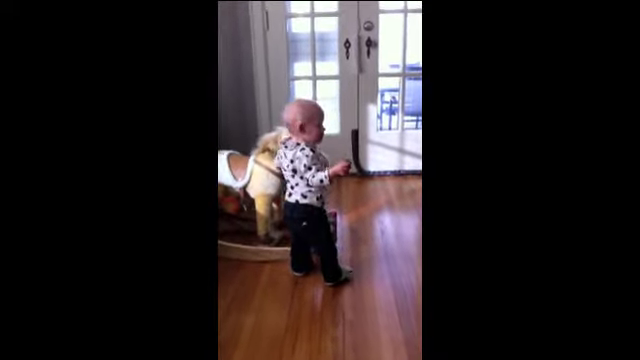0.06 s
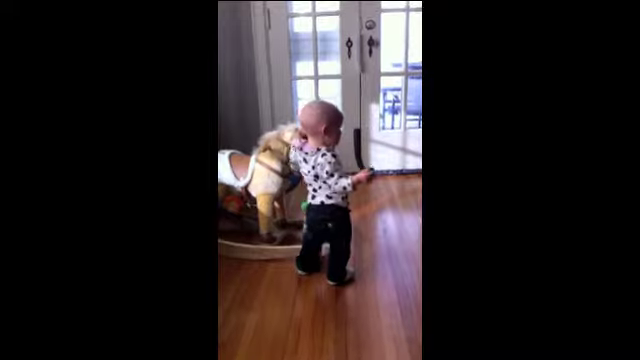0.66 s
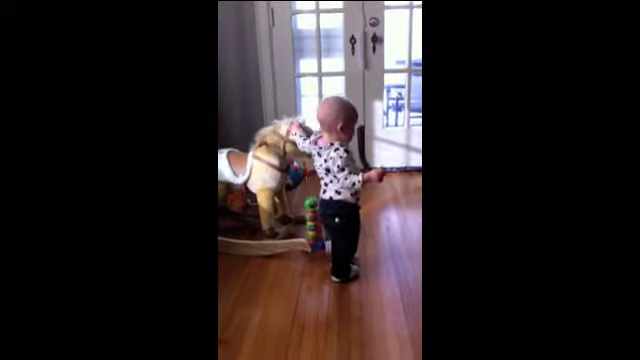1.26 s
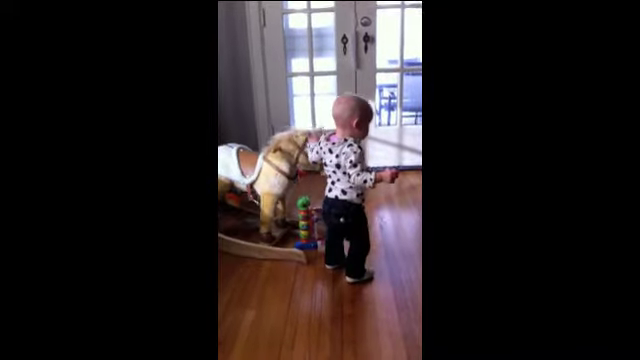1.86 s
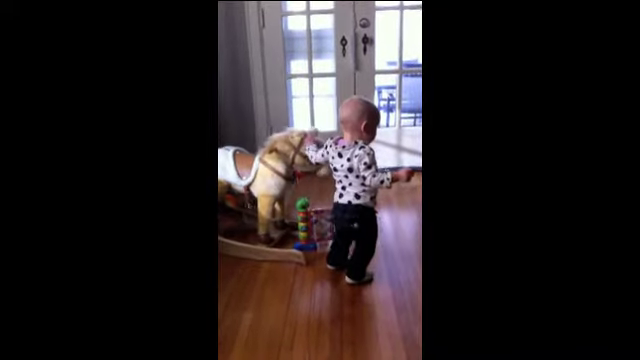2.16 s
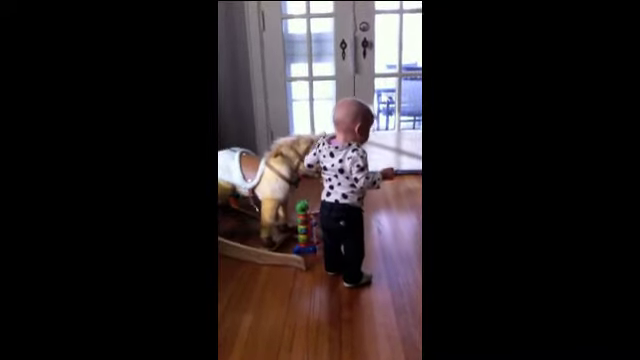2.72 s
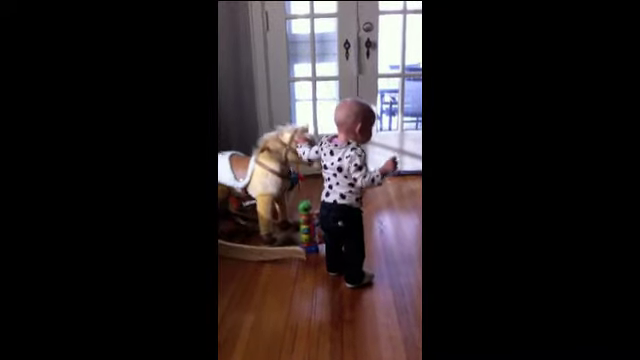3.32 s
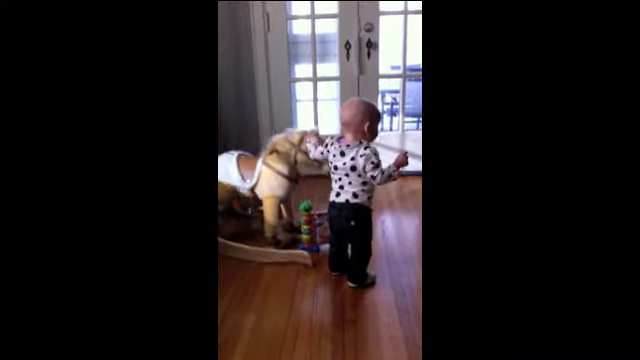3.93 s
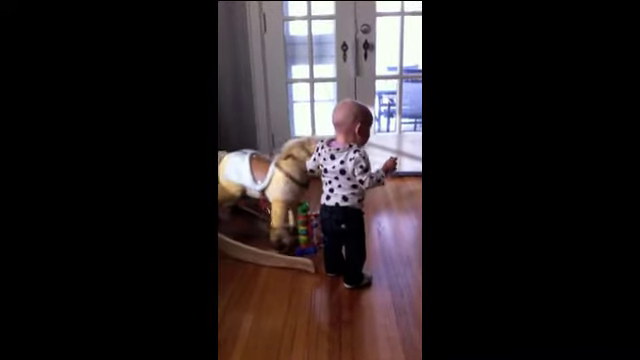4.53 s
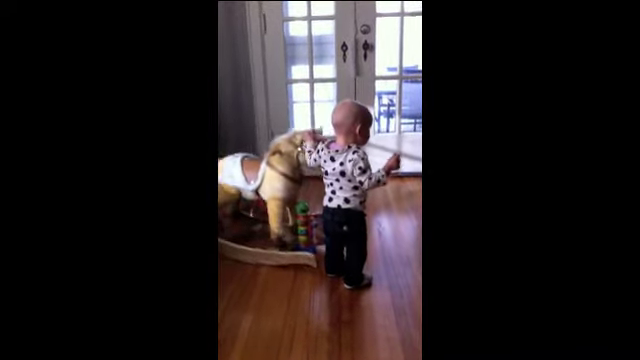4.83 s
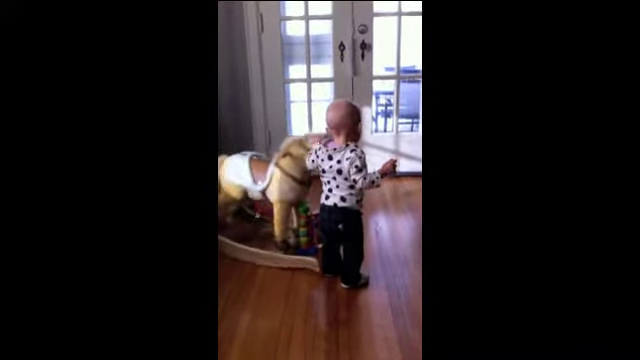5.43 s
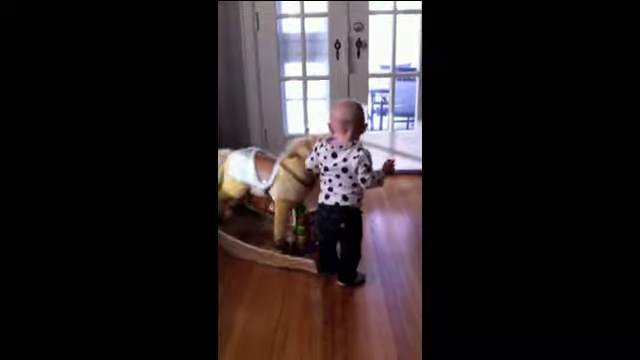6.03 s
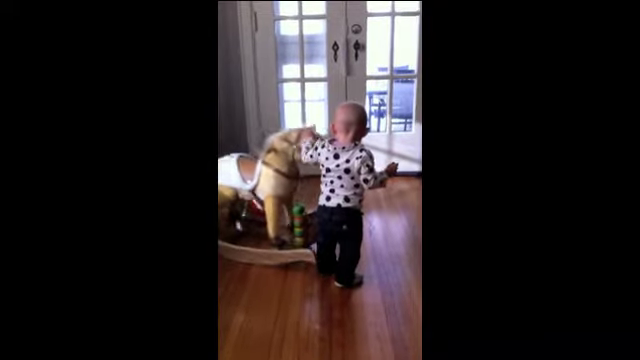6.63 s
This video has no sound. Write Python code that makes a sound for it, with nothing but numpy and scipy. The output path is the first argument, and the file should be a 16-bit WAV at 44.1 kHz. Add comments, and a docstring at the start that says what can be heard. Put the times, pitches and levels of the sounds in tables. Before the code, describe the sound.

Steady wooden knocks and hollow floorboard thumps from a toy rocking horse, with a light rattle over the last swings.

```python
"""A toddler on a wooden rocking horse, on a living room's hardwood floor, heard by one small microphone.
A toy is tapped, and cloth brushes the plush over a faint hiss as the child takes hold. From about 2 s
the horse swings six times: a rocker rolls in and knocks on the boards, the weight lands with a deeper
thump, and the horse rolls back. Between swings the boards bump softly. Over the last two swings the
harness rattles, and two faint squeaks follow."""
import sys
import numpy as np
from scipy import signal
from scipy.fft import rfft, irfft, next_fast_len
from scipy.io import wavfile
from scipy.ndimage import uniform_filter1d

SR = 44100
rng = np.random.default_rng(int(sys.argv[2]) if len(sys.argv) > 2 else 0)


def master(y):
    """Save y as 16-bit WAV."""
    cut = np.clip(np.atleast_2d(y).T, -1, 1)
    pcm = np.round(cut * 32767)  # scale
    wavfile.write(sys.argv[1], SR, pcm.astype(np.int16))


N = 294487
AGE = np.arange(SR) / SR  # seconds since a contact

# The living room's reverberation. Each row: frequency in Hz, seconds to fall 60 dB.
ROOM_DECAY = [(60, 0.27), (130, 0.8), (250, 0.63), (600, 0.55), (1500, 0.47), (3000, 0.44), (6000, 0.5),
              (14000, 0.33)]

# Noise colours. Each row: frequency in Hz, relative spectral density in dB.
HISS_SPECTRUM = [(15, -61.5), (25, -43), (92, -20), (130, -3.5), (153, -13), (236, -7), (354, -16.5),
                 (394, -12), (439, -17.5), (659, -16.5), (840, -17.5), (1400, -18.5), (16000, -26)]  # room tone
CLOTH_SPECTRUM = [(200, -10), (700, 4), (1300, -3), (3200, -4.5), (6000, -10), (15000, -10)]  # sleeves on plush
TICK_SPECTRUM = [(400, -10), (1000, -3), (2000, -1), (4000, -7.5), (7000, -14), (15000, -11)]  # a small hard contact
CLACK_SPECTRUM = [(150, -11), (300, 8), (700, 0.5), (1800, -4), (3000, -8.5), (6000, -32.5)]  # loose parts colliding
CRACK_SPECTRUM = [(1500, -17), (3000, -1), (5000, 2), (7500, -2.5), (12000, 1), (16000, -6.5)]  # the treble of a hit or rattle
RUMBLE_SPECTRUM = [(30, -40), (90, -12), (130, -3), (215, 2), (290, -4.5), (400, -13), (700, -19),
                   (1500, -37.5), (4000, -67)]  # rockers rolling
BOOM_SPECTRUM = [(20, -41), (50, -48), (100, -20.5), (134, -3), (160, -9), (215, 0.5), (290, -2),
                 (355, -12.5), (450, -32), (900, -64)]  # the floor's spreading boom
THUMP_SPECTRUM = [(250, -26), (430, -0.5), (520, 3.5), (680, -4.5), (850, -10), (1200, -8), (1750, -14),
                  (2400, -18.5), (5000, -35), (9000, -69)]  # dense overtones of wood in a landing or bump
KNOCK_SPECTRUM = [(250, -33), (450, -6), (620, -14.5), (1200, -4.5), (1750, -8.5), (2300, -16),
                  (3200, -23.5), (5000, -31), (9000, -68)]  # dense overtones of wood in a knock
SNAP_SPECTRUM = [(1000, -28), (3000, -5), (6000, -37), (9000, -8), (12500, 11), (16000, 9)]  # a rocker's sharp edge

# Ringing wood. Each row: frequency in Hz, relative level in dB, seconds to fall 60 dB.
TOY_MODES = [(750, -20, 0.4), (1140, 6, 0.19), (1810, 8, 0.2), (1960, -11, 1.2), (2560, 11, 0.069),
             (3860, -9, 0.39)]  # a wooden toy
JOIST_MODES = [(130.8, -6, 1.8), (140.6, 0, 0.68)]  # the floor's slow, deep ring
LIGHT_BOARD_MODES = [(156, -9, 0.22), (188, -3, 0.15), (219.1, 2, 0.3), (240.9, -1.5, 0.28),
                     (304, -2, 0.22)]  # floorboards under a knock or bump
LOADED_BOARD_MODES = [(164, -11, 0.085), (191.4, -1, 0.24), (239.1, -3.5, 0.49), (258.2, -12, 0.36),
                      (304.7, -0.5, 0.32), (351.5, -15.5, 0.74)]  # floorboards under the full weight
FRAME_MODES = [(502.5, -5, 0.29), (618, 13, 0.044), (796, 1, 0.071), (887, -6, 0.13), (979, -0.5, 0.11),
               (1053, -9, 0.12), (1163, 0.5, 0.29), (1285, -6.5, 0.16), (1657, 13, 0.03), (1743, 0, 0.066),
               (1875, -3, 0.11), (2530, -6, 0.066)]  # the horse's frame

# Cloth on plush as the child takes hold. Each row: peak time in seconds, level in dB.
CLOTH_BRUSHES = [(0.29, -68), (0.79, -67.5), (0.92, -69.5), (1.05, -64), (1.714, -64.5), (1.861, -65.5),
                 (2.26, -68.5)]
# Faint rubbing squeaks. Each row: peak time in seconds, pitch in Hz, level in dB.
RUB_SQUEAKS = [(.18, 700, -70.5), (0.305, 3570, -74), (0.913, 2400, -75), (2.225, 3060, -77),
               (6.41, 840, -68.5), (6.59, 780, -65)]
# Harness and toys rattling. Each row: start in seconds, clack level in dB, fizz level in dB.
HARNESS_RATTLES = [(0.0034, -58, -62), (1.318, -66.5, -69.5), (5.2779, -48, -54.5), (5.4768, -45, -57.5),
                   (5.9614, -69.5, -68.5), (6.0743, -57, -67.5), (6.128, -55, -59), (6.239, -65, -58)]
# Sharp little ticks. Each row: start in seconds, level in dB.
SMALL_TICKS = [(0.624, -71), (0.749, -68.5), (0.806, -71), (5.233, -67), (5.549, -66)]
# Feet and rockers bumping the boards. Each row: start in seconds, level in dB.
FLOOR_BUMPS = [(0.004, -54.5), (1.317, -66.5), (1.734, -50.5), (1.797, -58.5), (2.823, -48.5),
               (3.181, -52.5), (3.554, -49.5), (4.087, -63), (4.427, -50.5), (5.217, -50.5), (5.281, -43.5),
               (5.446, -39.5), (5.984, -47), (6.132, -39), (6.245, -44.5)]
# The weight landing after each knock, twice after the hardest.
# Each row: start in seconds, then weight and hardness in dB against an ordinary landing.
LANDINGS = [(1.9555, -11.5, 1.5), (2.7421, -7.5, 1.5), (3.759, 2.5, 2), (4.5545, 3.5, -5), (4.6518, 8.5, 0),
            (5.4108, 5.5, 0.5), (6.1727, .5, -1.5)]
# A rocker meeting the floor, once a swing.
# Each row: start in seconds, then force, hardness and edge snap in dB against an ordinary knock.
ROCKER_KNOCKS = [(1.915, -7, 3, 2), (2.677, -2.5, 2, 1), (3.681, 0, -.5, 0), (4.5265, 3, 1, 0),
                 (5.3149, 1.4, 5, -3), (6.106, 0, -1, 6)]

ROLL_BACK_S, ROLL_BACK_WIDTH_S = 0.48, 0.15  # the back swing: delay after a knock, width of its swell


def amp(db):
    """Decibels to gain."""
    return 10 ** (np.asarray(db) / 20)


def along(points, hz):
    """Read (Hz, value) points on a log frequency axis."""
    freqs, values = np.transpose(points)
    return np.interp(np.log(hz + 1), np.log(freqs + 1), values)


def filtered(x, kind, hz, order=4):
    """Butterworth low-pass or high-pass."""
    return signal.sosfilt(signal.butter(order, hz, kind, fs=SR, output="sos"), x)


def noise(spectrum, size):
    """Coloured noise of rms 1."""
    padded = next_fast_len(size)
    colour = amp(along(spectrum, np.fft.rfftfreq(padded, 1 / SR)))
    x = irfft(rfft(rng.standard_normal(padded)) * colour, padded)[:size]
    return x / x.std()


def burst(x):
    """Scale a hit to rms 1 over its first 40 ms."""
    return x / np.sqrt(np.mean(x[:SR // 25] ** 2))


def add(track, s, x):
    """Mix x into the track from s seconds on."""
    start = max(round(s * SR), 0)
    track[start:start + len(x)] += x[:N - start]


def rise(seconds):
    """The soft start of a contact."""
    return 1 - np.exp(-AGE / seconds)


def swell(s, db, width_s):
    """A bell-shaped gain that peaks at s seconds."""
    return amp(db) * np.exp(-((np.arange(N) / SR - s) / width_s) ** 2 / 2)


def ring(modes):
    """Damped modes; the shifting load gives each strike slightly new strengths and pitches."""
    hz, db, t60 = np.transpose(modes)[:, :, None]
    level_db = db + 2 * rng.standard_normal(hz.shape)
    pitch = hz * (1 + 0.012 * rng.standard_normal(hz.shape))
    sign = (-1) ** np.arange(len(hz))[:, None]
    partials = sign * amp(level_db - 60 * AGE / t60) * np.sin(2 * np.pi * pitch * AGE)
    return burst(partials.sum(0))


def puff(spectrum, t60):
    """Decaying noise: a dense cluster of short overtones."""
    return burst(noise(spectrum, SR) * amp(-60 * AGE / t60))


def room_decay(x):
    """Each frequency of x dies away at the room's own speed."""
    hz, t, spectra = signal.stft(x, SR, nperseg=512)
    fade = amp(-60 * t / along(ROOM_DECAY, hz)[:, None])
    return signal.istft(spectra * fade, SR, nperseg=512)[1][:SR]


def in_room(x, room_db):
    """The direct sound reaches the microphone first, then the diffuse answer of the walls."""
    tail = room_decay(rng.standard_normal(SR)) * rise(0.0016)
    reverb = signal.fftconvolve(x, tail / np.linalg.norm(tail))[:SR]
    return burst(x + amp(room_db) * reverb)


def room_tone():
    """Steady hiss with a faint electrical whine lies behind everything."""
    whine = np.sin(2 * np.pi * 15000 * np.arange(N) / SR)
    return amp(-69.5) * noise(HISS_SPECTRUM, N) + amp(-89) * whine


def cloth():
    """Sleeves brush the plush in grainy swells: on taking hold, then on every back swing."""
    grain = uniform_filter1d(rng.standard_normal(N), size=150)
    taking_hold = sum(swell(s, db, width_s=0.047) for s, db in CLOTH_BRUSHES)
    rocking = sum(swell(s + ROLL_BACK_S, -76.5 + 0.4 * force_db, ROLL_BACK_WIDTH_S)
                  for s, force_db, *_ in ROCKER_KNOCKS)
    return (taking_hold + rocking) * amp(grain / grain.std()) * noise(CLOTH_SPECTRUM, N)


def squeaks():
    """Rubbing surfaces sing faintly in a narrow band of noise."""
    out = np.zeros(N)
    for s, hz, db in RUB_SQUEAKS:
        band = [(hz * 0.5, -70), (hz * 0.83, -12), (hz, 0), (hz * 1.17, -12), (hz * 1.7, -70)]
        out += swell(s, db, width_s=0.064) * noise(band, N)
    return out


def rattles():
    """Loose parts of harness and toys clack, fizz and tick; a wooden toy is tapped at the start."""
    out = np.zeros(N)
    for s, clack_db, fizz_db in HARNESS_RATTLES:
        clack = in_room(puff(CLACK_SPECTRUM, t60=0.063) * rise(0.0022), room_db=4.5)
        fizz = in_room(puff(CRACK_SPECTRUM, t60=0.071) * rise(0.002), room_db=1)
        add(out, s, amp(clack_db) * clack + amp(fizz_db) * fizz)
    for s, db in SMALL_TICKS:
        add(out, s, amp(db) * in_room(puff(TICK_SPECTRUM, t60=0.016), room_db=-4))
    add(out, 0.00295, amp(-61.5) * in_room(ring(TOY_MODES), room_db=-3))
    return out


def rolling():
    """The curved rockers rumble over the boards into each knock and again on the way back."""
    level = np.zeros(N)
    for s, force_db, *_ in ROCKER_KNOCKS:
        roll_in = swell(s - 0.036, -61.5 + 4 * force_db, width_s=0.042)
        roll_back = swell(s + ROLL_BACK_S, -64 + 1.37 * force_db, ROLL_BACK_WIDTH_S)
        level += roll_in + roll_back
    return level * noise(RUMBLE_SPECTRUM, N)


def floor_boom(modes):
    """The boards at the contact ring first; the boom then spreads farther through floor and room."""
    boards = ring(modes)
    spread = burst(room_decay(noise(BOOM_SPECTRUM, SR))) * rise(0.025)
    return boards + amp(-4.5) * spread


def bumps():
    """Soft contacts stir the boards with hardly any treble; harder ones are woodier."""
    out = np.zeros(N)
    typical_db = -47
    for s, db in FLOOR_BUMPS:
        floor = amp(-6) * floor_boom(LIGHT_BOARD_MODES) + puff(BOOM_SPECTRUM, t60=0.056)
        boom = burst(floor * rise(0.017))
        wood = in_room(puff(THUMP_SPECTRUM, t60=0.054) * rise(0.0079), room_db=1)
        add(out, s, amp(db) * (boom + amp(-17 + db - typical_db) * wood))
    return out


def softened(boom, force_db):
    """A lighter contact lasts longer and wakes less of the floor's upper modes."""
    ordinary_hz, octaves_per_db = 350, 0.057
    edge_hz = np.clip(ordinary_hz * 2 ** (octaves_per_db * force_db), 100, 2000)
    return burst(filtered(boom, "low", edge_hz))


def struck_wood(x, hollow_db, clack_db):
    """The frame answers with a hollow low band and a bright clack; a harder contact clacks higher."""
    edge_hz = 1100 * 2 ** (0.013 * np.clip(clack_db - hollow_db, -12, 12))
    hollow = burst(filtered(x, "low", 900))
    clack = burst(filtered(x, "high", edge_hz))
    return amp(hollow_db) * hollow + amp(clack_db) * clack


def thumps():
    """The weight comes down on the rockers: the loaded boards boom and the joists swing up slowly."""
    out = np.zeros(N)
    load = 1 + 0.7 * np.exp(-((AGE - 0.022) / 0.011) ** 2)  # peaks just after contact
    for s, weight_db, hard_db in LANDINGS:
        strike_db = weight_db + hard_db
        boards = softened(floor_boom(LOADED_BOARD_MODES) * rise(0.00088) * load, weight_db)
        boom = boards + amp(-27) * ring(JOIST_MODES) * rise(0.042)
        frame = in_room(amp(-14) * ring(FRAME_MODES) + puff(THUMP_SPECTRUM, t60=0.062), room_db=0.5)
        wood = struck_wood(frame, hollow_db=-44 + strike_db, clack_db=-54 + 1.32 * weight_db)
        crack = in_room(puff(CRACK_SPECTRUM, t60=0.19) * rise(0.001), room_db=-1)
        add(out, s, amp(-31.5 + weight_db) * boom + wood + amp(-66.5 + 0.88 * strike_db) * crack)
    return out


def knocks():
    """The hard edge of a rocker cracks on the boards; frame and floor ring, brighter with more force."""
    out = np.zeros(N)
    for s, force_db, hard_db, snap_db in ROCKER_KNOCKS:
        boom = softened(floor_boom(LIGHT_BOARD_MODES) * rise(0.0013), force_db)
        frame = ring(FRAME_MODES) + amp(1.5) * puff(KNOCK_SPECTRUM, t60=0.075)
        frame = in_room(frame, room_db=-1) * rise(0.00056)
        wood = struck_wood(frame, hollow_db=-42 + force_db, clack_db=-46.5 + 2.56 * force_db + hard_db)
        crack = in_room(puff(CRACK_SPECTRUM, t60=0.2), room_db=-7)
        snap = puff(SNAP_SPECTRUM, t60=0.009)  # reaches the microphone dry
        edge_db = 1.17 * force_db
        add(out, s, amp(-33 + force_db) * boom + wood + amp(-58 + edge_db) * crack)
        add(out, s + 0.0015, amp(-60 + edge_db + snap_db) * snap)
    return out


def scene():
    """Horse, floor and room tone meet at one microphone in the living room."""
    return (knocks() + thumps() + bumps() + rolling() + rattles() + squeaks() + cloth() + room_tone())[None]


def record(dry):
    """The small microphone thins the deep bass; the recorder keeps nothing above its band limit."""
    low_cut_hz, top_hz = 55, 15900
    thin = filtered(dry, "high", low_cut_hz, order=2)
    padded = next_fast_len(N + SR // 2)
    in_band = np.fft.rfftfreq(padded, 1 / SR) < top_hz
    return irfft(rfft(thin, padded) * in_band, padded)[..., :N]


dry = scene()
out = record(dry)
master(out)
```